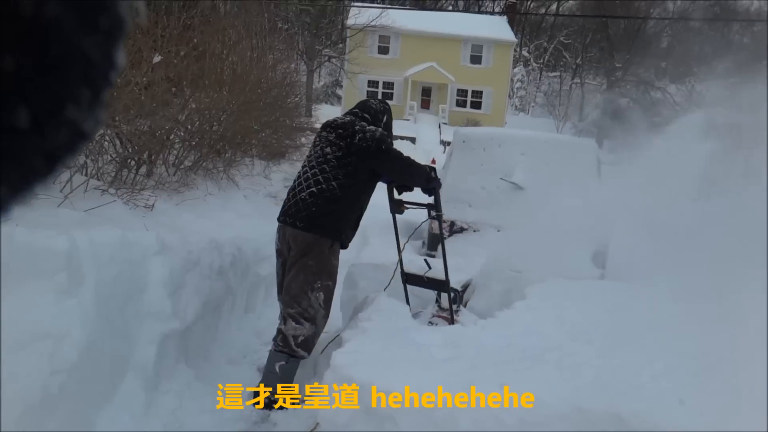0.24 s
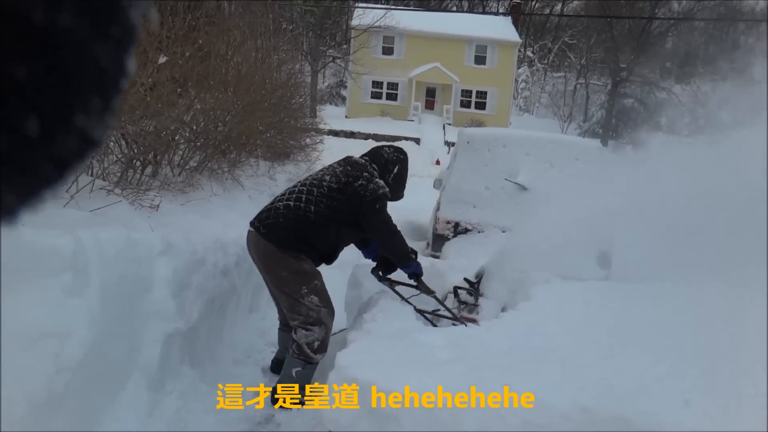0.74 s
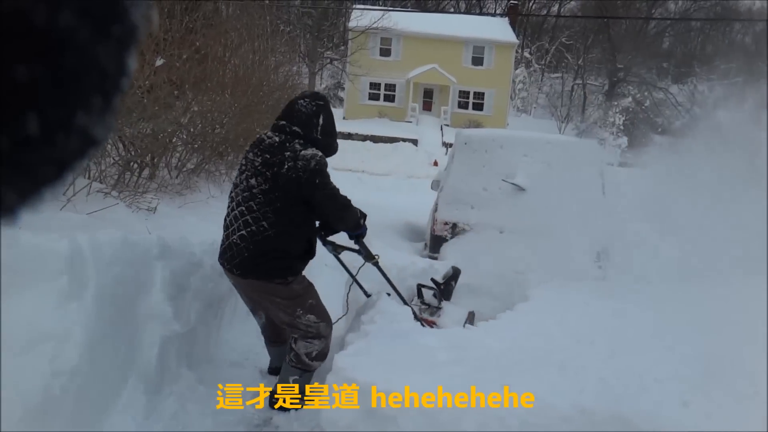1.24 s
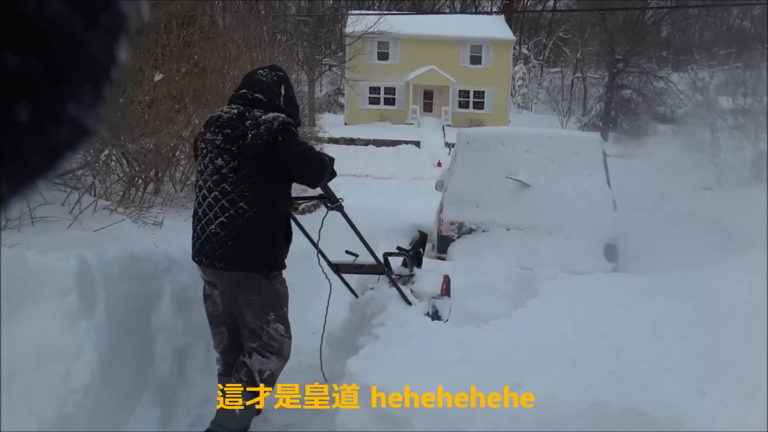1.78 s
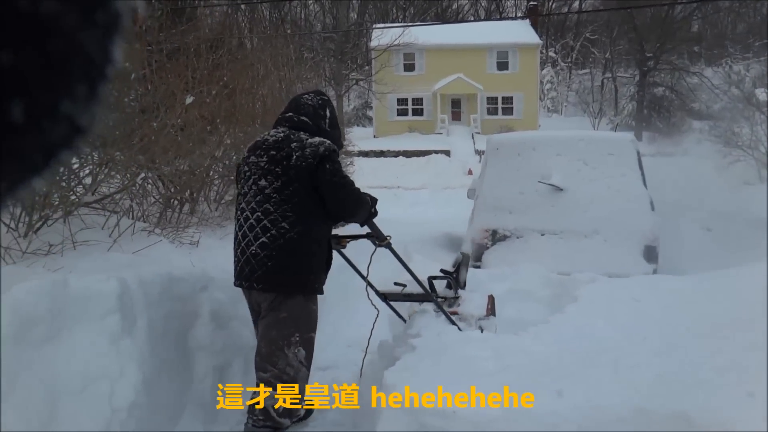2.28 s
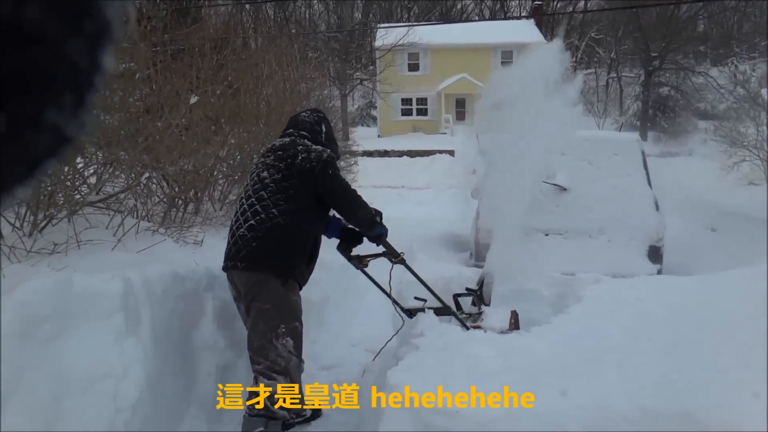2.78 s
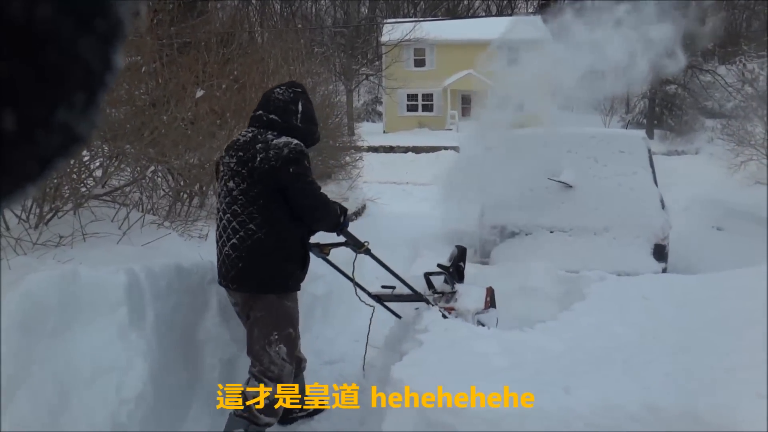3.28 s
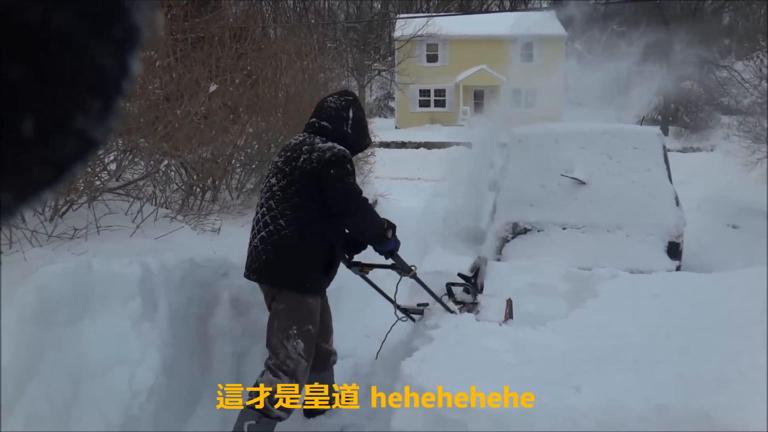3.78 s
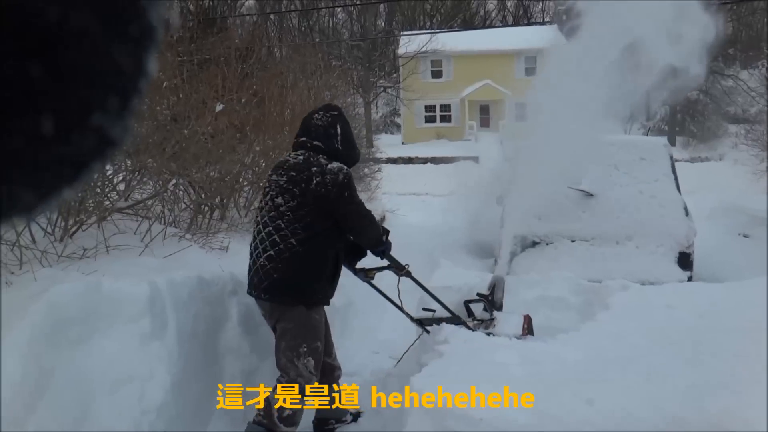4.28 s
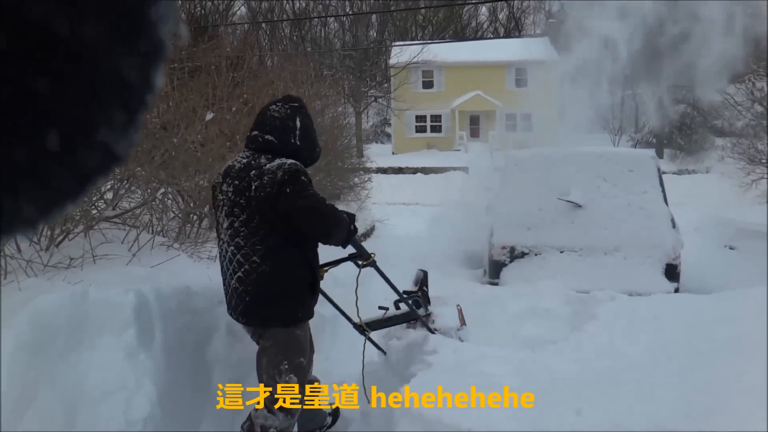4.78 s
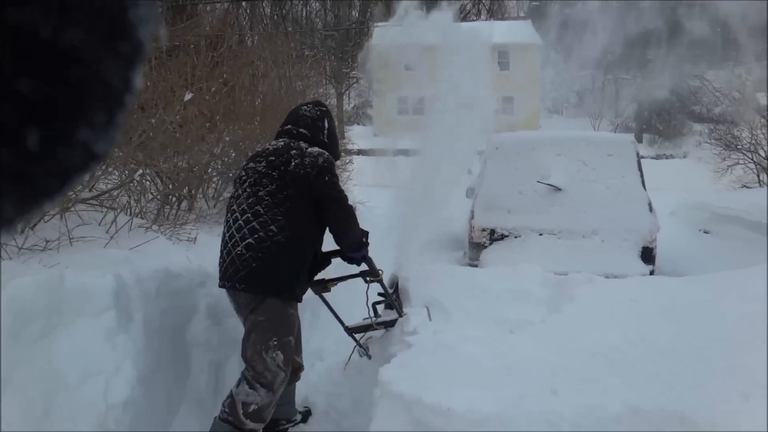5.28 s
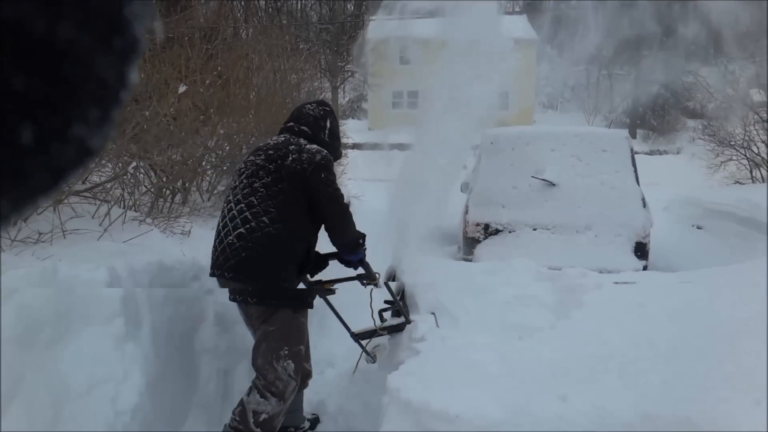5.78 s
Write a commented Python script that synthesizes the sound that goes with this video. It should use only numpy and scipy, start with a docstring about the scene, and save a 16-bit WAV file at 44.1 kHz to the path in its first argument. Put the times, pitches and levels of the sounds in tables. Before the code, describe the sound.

Outdoors, an electric machine churns snow with a whining motor and a broad, grainy, plastic-coloured roar. Early on come metallic ice clatter, hard plastic knocks and a low crunch, then a strong drop in pitch and a whistling recovery. A long full-power stretch follows, dipping briefly, before quieter bogging and sudden silence. The microphone is a few metres off, with little echo and soft low gusts.

```python
"""Snow blower in deep snow

A corded electric snow blower is pushed into deep snow a few metres away, in the open, in a light breeze.
Each push bogs down the motor, a set of whining shaft multiples, and it winds up again; a two-paddle rotor
churns snow, made of random grains and noise, through the resonances of a plastic housing and chute.
Where it digs down, paddle beats growl and icy impacts ring the metal scraper; the sound stops dead."""
import sys
import numpy as np
from scipy import signal
from scipy.fft import rfft, irfft, next_fast_len
from scipy.io import wavfile

SR = 44100
rng = np.random.default_rng(int(sys.argv[2]) if len(sys.argv) > 2 else 0)


def int16_out(signal):
    """Quantize to a 16-bit WAV file."""
    q = np.round(np.clip(np.atleast_2d(signal).T, -1, 1) * 32767)
    wavfile.write(sys.argv[1], SR, q.astype(np.int16))


N = 266672


def from_db(db):
    """Decibels to gain."""
    return 10 ** (np.asarray(db) / 20)


def rms_one(x):
    """Scale to unit rms."""
    return x / np.sqrt(np.mean(x ** 2) + 1e-20)


def seconds():
    """Time of every sample in seconds."""
    return np.arange(N) / SR


def bins():
    """Frequency axis of the filters in Hz, kept above zero."""
    return np.maximum(np.fft.rfftfreq(next_fast_len(N), 1 / SR), 1)


def shaped(x, gain):
    """Filter by a gain per frequency."""
    size = next_fast_len(N)
    return irfft(rfft(x, size) * gain, size)[..., :N]


def along_hz(points):
    """Join the points of a short spectrum on a log frequency axis, in dB."""
    hz, db = np.transpose(points)
    return np.interp(np.log(bins()), np.log(hz), db)


def drift(rate_hz):
    """Slow random wander with unit spread."""
    return rms_one(shaped(rng.standard_normal(N), 1 / (1 + (bins() / rate_hz) ** 2)))


def spell(start, end, attack_s, release_s):
    """Envelope of one contact: a rise centred on the start, a hold, an exponential decay."""
    t = seconds()
    rise = np.clip((t - start) / attack_s + .5, 0, 1)
    return rise * np.exp(-np.maximum(t - end, 0) / release_s)


def resonance(hz, centre_hz, width_hz):
    """Gain of a resonance for a tone sliding across it."""
    return 1 / np.hypot(1, 2 * (hz - centre_hz) / width_hz)


def strike(clicks, modes):
    """Clicks ring every decaying mode, each time with a strength of its own."""
    out = np.zeros(N)
    for k, (hz, db, t60) in enumerate(modes):
        radius = from_db(-60 / (t60 * SR))
        angle = 2 * np.pi * hz / SR
        force = clicks * from_db(db + 3 * rng.standard_normal(N))
        ringing = [1, -2 * radius * np.cos(angle), radius * radius]
        # alternate signs keep neighbouring modes from adding up
        out += (-1) ** k * signal.lfilter([0, np.sin(angle)], ringing, force + 1e-18)
    return out


def grains(per_s, spread_db):
    """Random impacts of either sign, mostly small and a few large."""
    sizes = from_db(spread_db * np.minimum(rng.exponential(1, N), 4)) * rng.choice([-1, 1], N)
    return sizes * (rng.random(N) < per_s / SR)


def crumbling(rows, decay_s):
    """Each piece of ice breaks up into a short, uneven spatter of its own."""
    age = np.arange(SR // 40) / SR
    out = np.zeros(N)
    for s, db in rows:
        # cubing the noise makes it spiky
        burst = rng.standard_normal(len(age)) ** 3 * np.exp(-age / decay_s)
        start = round(s * SR)
        out[start:start + len(age)] += from_db(db) * burst / np.linalg.norm(burst)
    return out


# broad spectrum of churned snow: (frequency [Hz], relative level per Hz [dB])
CHURN_SPECTRUM = [(25, -26.5), (50, -26.5), (90, -18.5), (200, -9), (450, -7.5), (850, 1), (1200, -2),
                  (1750, -6.5), (3300, 2.5), (5400, -8.5), (7600, -15), (10500, -7), (12000, -21.5),
                  (16000, -26.5)]
# housing and chute resonances: (frequency [Hz], width [Hz], boost [dB])
HOUSING_PEAKS = [(314, 180, 2), (574, 46, 3), (789, 21, 4), (984, 460, 6), (1228, 200, 3.5), (1575, 140, 5),
                 (1988, 76, 3), (2080, 74, 3.5), (2174, 41, 10.5), (2767, 27, 0), (3010, 260, 4.5),
                 (3380, 480, 4.5), (4120, 320, 7), (4830, 1300, 6.5), (6034, 150, 7), (6280, 130, 5.5),
                 (6970, 230, 4.5), (8040, 180, 7.5), (8720, 130, 6), (9060, 220, 5), (9860, 270, 5.5),
                 (12950, 300, 3.5), (13950, 350, 4.5), (15430, 300, 3.5)]


def housing_band(x, low_hz, high_hz):
    """One frequency range of an excitation, coloured by snow and housing resonances; unit rms."""
    f = bins()
    peaks_db = sum(db / (1 + (2 * (f - hz) / width) ** 2) for hz, width, db in HOUSING_PEAKS)
    colour_db = along_hz(CHURN_SPECTRUM) + peaks_db
    band = ((1 + (low_hz / f) ** 16) * (1 + (f / high_hz) ** 16)) ** -.5
    return rms_one(shaped(x, from_db(colour_db) * band))


# short gusts: (time of the peak [s], length [s], level [dB])
WIND_GUSTS = [(1.385, .07, -46), (1.552, 0.11, -40.5), (1.748, .04, -39.5), (1.9, 0.086, -39.5),
              (2.145, 0.044, -38.5), (2.357, .05, -40), (2.598, 0.078, -42.5), (2.817, 0.17, -41.5),
              (3.955, .13, -38), (4.224, 0.13, -45), (4.94, 0.045, -49), (5.32, .1, -47)]
BREEZE_DB, BREEZE_SWING_DB = -60.5, 6


def wind(apart_share=.4):
    """Low noise as a light, wavering breeze with short gusts, a little different left and right."""
    t = seconds()
    gusts = sum(from_db(db) * np.exp(-2 * ((t - s) / length) ** 2) for s, length, db in WIND_GUSTS)
    breeze = from_db(BREEZE_DB + BREEZE_SWING_DB * drift(3.6))
    common = housing_band(rng.standard_normal(N), 28, 135)
    apart = housing_band(rng.standard_normal(N), 30, 190)
    return np.hypot(gusts, breeze) * (common + apart_share * apart * np.array([[1], [-1]]))


# spectrum of the scattered sound: (frequency [Hz], side against mid [dB])
SIDE_SPECTRUM = [(30, -26), (100, -41), (300, -22.5), (700, -23.5), (1300, -15), (2500, -27.5),
                 (14000, -89.5)]


def yard(mid):
    """The snowy yard scatters a very faint, short tail of dense echoes to the sides."""
    age = np.arange(SR // 10) / SR
    echoes = rng.standard_normal(len(age)) * np.exp(-age / .02)
    scattered = signal.fftconvolve(mid, echoes / np.linalg.norm(echoes))[:N]
    return shaped(scattered, from_db(along_hz(SIDE_SPECTRUM)))


# hard lumps on plastic: (time [s], strength [dB], left minus right [dB])
LUMPS = [(.426, -9, 0), (0.454, -5, 0), (0.485, -10, 1.5), (0.613, 0, -15.5), (.6795, -21, 9),
         (1.2279, -14, -27), (4.18, -20.5, -26)]
# plastic modes: (frequency [Hz], average level [dB], 60 dB decay time [s])
PLASTIC_MODES = [(2300, -19, .008), (3100, -4, .009), (3420, -3, .008)]


def knocks():
    """Hard lumps ring short plastic modes, each from its own place between left and right."""
    out = np.zeros((2, N))
    for s, db, pan_db in LUMPS:
        click = np.zeros(N)
        click[round(s * SR)] = from_db(db)
        out += from_db([[pan_db / 2], [-pan_db / 2]]) * strike(click, PLASTIC_MODES)
    return out


# snow going through the machine, as its roar: (time [s], level [dB])
ROAR_CURVE = [(0.0, -19.5), (0.2, -22.0), (0.5, -24.5), (0.59, -27), (0.65, -34.5), (0.86, -34.5),
              (1.19, -25.5), (1.45, -24.0), (1.55, -20), (1.8, -18), (2.45, -19), (2.9, -23), (3.55, -17.5),
              (3.8, -21), (4.29, -28), (4.35, -33.5), (4.8, -29), (5.05, -32.5), (5.2, -37), (5.47, -43)]
FULL_ROAR_DB = -18  # reference for levels given "at full roar"


def roar_level():
    """Roar level in dB at every sample, joined by straight lines."""
    s, db = np.transpose(ROAR_CURVE)
    return np.interp(seconds(), s, db)


# pushes into the snow: (time of the deepest sag [s], hold [s], sag [turns per s], build-up [s])
SNOW_PUSHES = [(0.826, 0.1, 169, 0.43), (2.898, 0.002, 39.08, 0.234), (4.29, 0.025, 56.746, 0.205),
               (5.434, 0.038, 149, 0.2)]
FREE_TURNS_PER_S, RECOVER_S, BOG_SHAPE = 337.3, .249, 1.468


def shaft_speed():
    """Each push drags the motor down from free speed; once freed it recovers exponentially."""
    t = seconds()
    speed = np.full(N, FREE_TURNS_PER_S)
    for s, hold, sag, build in SNOW_PUSHES:
        bogging = (np.maximum(s - t, 0) / build) ** BOG_SHAPE
        recovery = np.maximum(t - s - hold, 0) / RECOVER_S
        speed -= sag * np.exp(-bogging - recovery)
    return speed * (1 + 0.00074 * drift(6.4))


# the scraper grinds over ice: (start [s], end [s], grit level [dB])
ICE_GRINDS = [(.24, .272, -20.5), (.305, .5, -22), (.585, .6, -24.5), (.62, .74, -33.5), (.87, 1.02, -40),
              (3.95, 4.06, -38), (5.26, 5.46, -41.5)]
GRIND_ATTACK_S, GRIND_RELEASE_S = 0.0074, 0.041
LOOSE_GRIT_DB = -30.5  # against the roar


def grit_level(roar_db):
    """Grit level in dB: a little rides with the snow, and more flies while the scraper grinds."""
    grinding = sum(from_db(db) * spell(start, end, GRIND_ATTACK_S, GRIND_RELEASE_S)
                   for start, end, db in ICE_GRINDS)
    return 20 * np.log10(np.hypot(grinding, from_db(roar_db + LOOSE_GRIT_DB)))


TICKS_PER_S, TICK_DB, TICK_DECAY_S = 210, -18, .0007
TICK_FOLLOWS = 0.45  # dB of tick level per dB of grit level


def pellets(grit_db):
    """Loose pellets burst at random, each a tiny puff of noise."""
    puff = np.exp(-np.arange(SR // 200) / SR / TICK_DECAY_S)
    envelope = signal.lfilter(puff, 1, grains(per_s=TICKS_PER_S, spread_db=2.5))
    bursts = envelope * rng.standard_normal(N)
    return from_db(TICK_DB + TICK_FOLLOWS * grit_db) * rms_one(bursts)


# ice specks landing close by: (time [s], relative level [dB])
ICE_SPECKS = [(2.1146, -12), (2.7123, -9), (3.0605, -2), (3.1683, 2), (4.0233, 3), (4.0647, -5),
              (4.3331, -4), (4.358, -9)]


def ticks(grit_db):
    """Pellets and close ice specks tick in a bright band without ringing."""
    small = pellets(grit_db) + from_db(9) * crumbling(ICE_SPECKS, TICK_DECAY_S)
    bright = signal.butter(1, [4000, 12000], "band", fs=SR, output="sos")
    return signal.sosfilt(bright, small)


# ice chips hitting the scraper: (time [s], relative level [dB])
ICE_CHIPS = [(0.2295, 7), (0.2706, 2), (0.2992, 5), (0.3226, 4.5), (0.354, 0), (0.3767, -3), (0.47, 3),
             (0.576, 1), (0.601, -0.5), (0.648, -12), (0.714, -2.5), (0.7757, -7), (0.994, -11),
             (5.2545, -18), (5.3104, -16)]
CHIP_DECAY_S = .0012
# scraper modes: (frequency [Hz], average level [dB], 60 dB decay time [s])
SCRAPER_MODES = [(2825, -13, .035), (3100, -8, .006), (4200, -10, .008), (6110, -5, .017), (7330, -8, .007),
                 (8130, -7, .005), (8930, -8, .009), (9560, -3, .005), (11450, -9, .007), (14220, -9, .009),
                 (15100, -17, .007)]


def scraper(grit_db, soft_hz=7000):
    """Ragged clumps of grit and larger, cracking chips ring the modes of the metal scraper."""
    clumps = grains(per_s=2200, spread_db=2.8) * from_db(2.5 * drift(110))
    hard = rms_one(strike(clumps, SCRAPER_MODES))
    # light contact leaves the highest modes weak
    soft = signal.sosfilt(signal.butter(2, soft_hz, fs=SR, output="sos"), hard)
    force = np.clip((grit_db + 32) / 10, 0, 1)
    grit = from_db(grit_db) * (force * hard + (1 - force) * soft)
    chips = crumbling(ICE_CHIPS, CHIP_DECAY_S)
    ringing = from_db(-9.5) * strike(chips, SCRAPER_MODES)
    crack_band = signal.butter(2, [1800, 10500], "band", fs=SR, output="sos")
    crack = from_db(7.5) * signal.sosfilt(crack_band, chips)
    return grit + ringing + crack


def paddle_beats(paddle):
    """One blow as each paddle meets the snow; one of the two bites harder."""
    uneven_db = 1.3 * drift(40)
    return np.diff(np.floor(paddle), prepend=0) * from_db(uneven_db + 3.5 * np.cos(np.pi * paddle))


# the rotor bites packed snow: (start [s], end [s], level [dB], share of paddle beats [0-1])
PACKED_BITES = [(0.137, 0.575, -28.5, 0.05), (0.634, .9, -40.5, 0.3), (.9, 0.978, -35, 0.6),
                (2.798, 3.1, -42, 0.3), (3.92, 4.278, -40.5, 0), (5.123, 5.385, -44.5, .9)]
BITE_ATTACK_S, BITE_RELEASE_S = 0.046, 0.026
BUMP_DB = -15  # against the bite
# drone of the loaded rotor: (multiple of its turning rate, level against the bite [dB])
ROTOR_DRONE = [(3, -14.5), (5, -8.5), (6, -8.5), (7, -11), (8, -12.5)]


def bites(paddle, scoop_hz=212, scoop_width_hz=55):
    """In packed snow the paddles growl, bump and crunch, and the rotor drones."""
    # the hollow scoop booms as the third multiple of the paddle rate slides across its resonance
    third = 3 * paddle
    third_hz = np.gradient(third) * SR
    boom = np.sin(2 * np.pi * third) * resonance(third_hz, scoop_hz, scoop_width_hz)
    growl = 0.83 * housing_band(paddle_beats(paddle), 190, 400) + 0.48 * boom
    drone = sum(from_db(db + 3.3 * drift(12)) * np.sin(np.pi * k * paddle) for k, db in ROTOR_DRONE)
    crunch = 0.7 * housing_band(rng.standard_normal(N), 150, 420)
    bumps = from_db(BUMP_DB) * housing_band(paddle_beats(paddle), 72, 150)
    out = np.zeros(N)
    for start, end, db, share in PACKED_BITES:
        beats = np.clip(share, 0, 1)
        sound = np.sqrt(beats) * growl + np.sqrt(1 - beats) * crunch + drone + bumps
        out += from_db(db) * spell(start, end, BITE_ATTACK_S, BITE_RELEASE_S) * sound
    return out


# motor casing modes: (frequency [Hz], average level [dB], 60 dB decay time [s])
CASING_MODES = [(2035, -5, .04), (2135, 0, .02), (2230, -2, .04), (2790, -1, .045), (6040, -6, .025),
                (10000, -2, .012)]


def casing(speed, roar_db):
    """Noise rings the casing modes, rising steeply with shaft speed as the motor shakes them."""
    shake_db = roar_db - 7 + 90 * np.log10(speed / FREE_TURNS_PER_S)
    return from_db(shake_db) * rms_one(strike(rng.standard_normal(N), CASING_MODES))


def order(k, turns):
    """One slightly unsteady multiple of the shaft speed, near unit rms."""
    tone = np.sin(2 * np.pi * k * turns + 0.25 * drift(25))
    return np.sqrt(2) * tone * from_db(1.4 * drift(13.0))


# shaft and paddle hum: (multiple of shaft speed, level within the hum [dB])
SHAFT_HUM = [(1, -16.5), (1.228, -18), (1.72, -20), (2, -20.5), (3, -12.5)]
MAINS_HZ = 60


def hum(turns, load_db, hum_db=-20.5):
    """Low shaft orders and two mains tones, swelling with the roar."""
    shaft = sum(from_db(db) * order(k, turns) for k, db in SHAFT_HUM)
    mains = 2 * np.pi * MAINS_HZ * seconds()
    buzz = from_db(-32) * np.sin(mains) + from_db(-28.5) * np.sin(2 * mains)
    return from_db(hum_db + load_db) * (shaft + buzz)


# the fan whistles as the motor strains: (start [s], end [s], level [dB])
FAN_WHISTLES = [(.73, 0.878, -44), (0.904, 1.362, -37.5), (4.08, 4.26, -40), (5.14, 5.252, -45.5)]
WHISTLE_ATTACK_S, WHISTLE_RELEASE_S = .05, 0.035
FAN_BLADES, WHISTLE_OCTAVE_DB = 18, -14


def fan(turns):
    """In timed spells the fan whistles at its blade-passing rate and an octave above."""
    strain = sum(from_db(db) * spell(start, end, WHISTLE_ATTACK_S, WHISTLE_RELEASE_S)
                 for start, end, db in FAN_WHISTLES)
    octave = from_db(WHISTLE_OCTAVE_DB) * order(2 * FAN_BLADES, turns)
    return strain * (order(FAN_BLADES, turns) + octave)


# drive and armature-slot tones: (multiple of shaft speed, resonance [Hz], width [Hz],
# level at full roar on resonance [dB], share of the roar's swing)
MOTOR_TONES = [(8.33, 2810, 69, -27.5, 1.8), (12, 4040, 150, -20, 1), (18, 6030, 650, -34, 1.3)]


def whine(turns, speed, load_db):
    """The drive sings and the armature slots whine, loudest as each tone passes its resonance."""
    return sum(from_db(db + share * load_db) * resonance(k * speed, hz, width) * order(k, turns)
               for k, hz, width, db, share in MOTOR_TONES)


# thud, drum, rush and spray: (low edge [Hz], high edge [Hz], level at full roar and free speed [dB],
# share of the roar's swing, tilt [dB per octave of speed])
SNOW_RANGES = [(155.3, 412, -36, 0.87, -3), (460, 1883, -21, 0.9, 0), (1780, 7830, -17, 1.11, 2.5),
               (6750, 17000, -20.5, 1, 5.5)]


def snow(paddle, speed, load_db):
    """Each paddle flings a load of crystals through the chute; a slower rotor sounds duller."""
    each_paddle_db = 0.21 * np.cos(2 * np.pi * paddle)
    each_turn_db = .5 * np.cos(np.pi * paddle)
    throw = from_db(each_paddle_db + each_turn_db + 0.42 * drift(48))
    impacts = rms_one(grains(per_s=9000, spread_db=3.0))
    crystals = throw * (impacts + 1.01 * rng.standard_normal(N))
    octaves = np.log2(speed / FREE_TURNS_PER_S)
    return sum(from_db(db + share * load_db + tilt * octaves) * housing_band(crystals, low, high)
               for low, high, db, share, tilt in SNOW_RANGES)


PADDLES_PER_TURN = .2456  # paddle passes per turn of the motor shaft


def scene():
    """The machine almost straight ahead, with faint scatter, wind and knocks around it."""
    speed = shaft_speed()
    turns = np.cumsum(speed) / SR
    paddle = turns * PADDLES_PER_TURN
    roar_db = roar_level()
    load_db = roar_db - FULL_ROAR_DB
    grit_db = grit_level(roar_db)
    ice = scraper(grit_db) + ticks(grit_db)
    motor = hum(turns, load_db) + whine(turns, speed, load_db) + fan(turns)
    mid = ice + bites(paddle) + casing(speed, roar_db) + motor + snow(paddle, speed, load_db)
    side = yard(mid)
    machine = np.array([mid + side, mid - side]) * from_db([[-.1], [.1]])
    return wind() + knocks() + machine


STOP_S, CUTOFF_HZ = 5.485, 15900


def record(dry):
    """The sound stops abruptly; the highest peaks clip and the treble above the cutoff is removed."""
    running = np.clip((STOP_S - seconds()) / 0.012, 0, 1)  # a 12 ms ramp down to silence
    clipped = np.clip(dry * running, -.88, .88)
    return signal.sosfilt(signal.ellip(10, .1, 80, CUTOFF_HZ, fs=SR, output="sos"), clipped)


dry = scene()
out = record(dry)
int16_out(out)
```